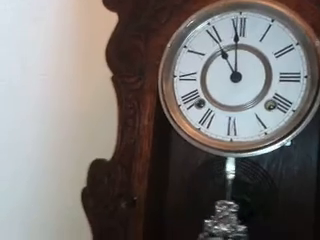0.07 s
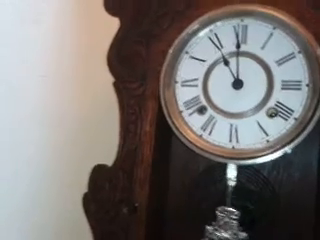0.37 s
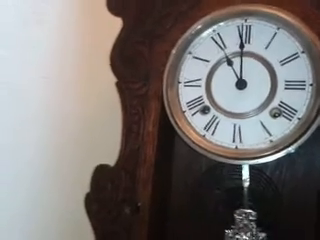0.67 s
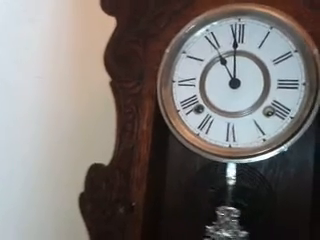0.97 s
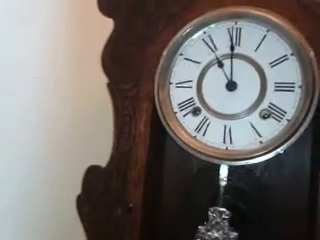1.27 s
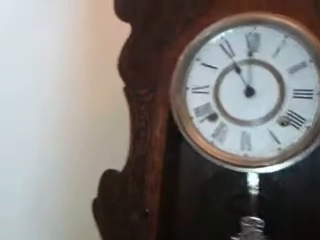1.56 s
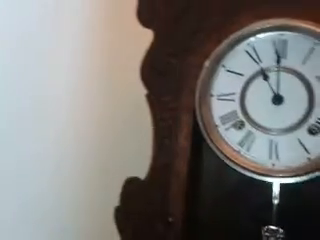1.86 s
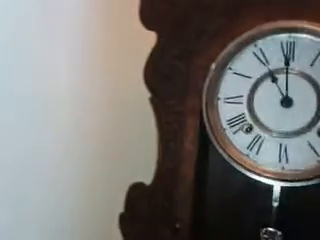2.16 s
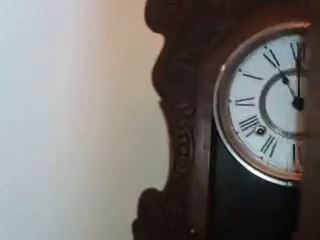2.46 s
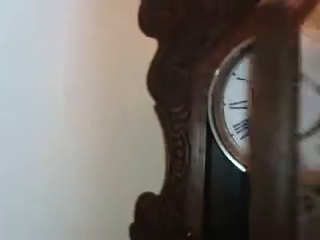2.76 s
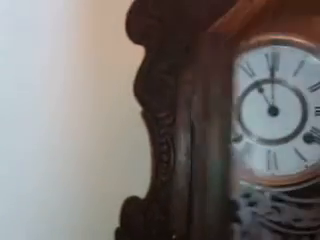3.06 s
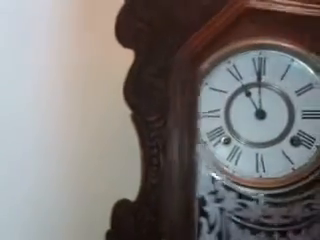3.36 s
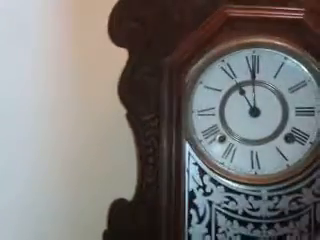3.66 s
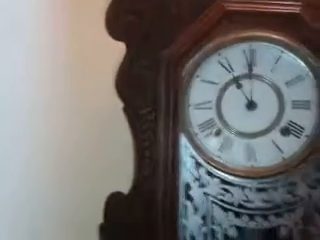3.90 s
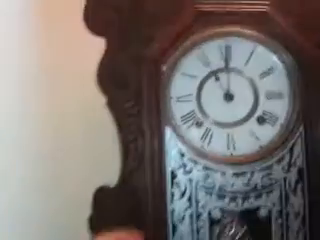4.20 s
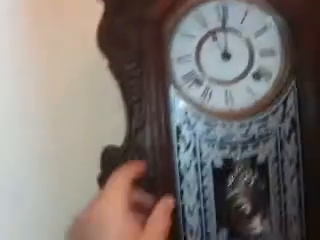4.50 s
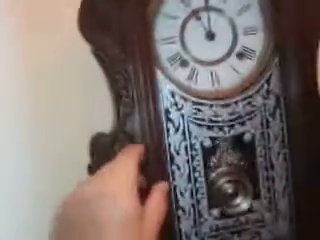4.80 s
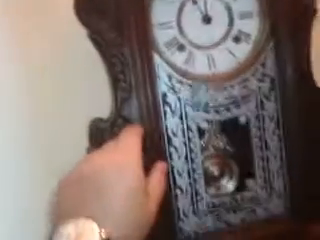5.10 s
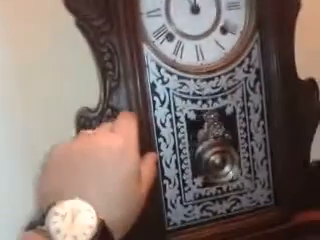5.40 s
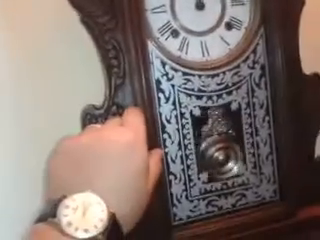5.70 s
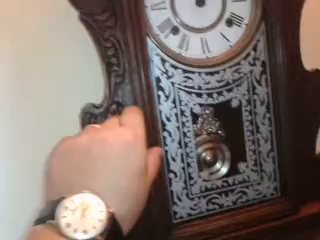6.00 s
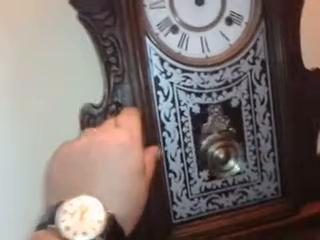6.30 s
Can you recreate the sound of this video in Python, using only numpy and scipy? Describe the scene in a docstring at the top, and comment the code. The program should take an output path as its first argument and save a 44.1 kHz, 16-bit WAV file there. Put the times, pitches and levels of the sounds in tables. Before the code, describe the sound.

An antique wooden clock is heard close up in a quiet room with faint hiss. Right at the start a padded hammer thuds on an already ringing wire gong, and it strikes again at about 1.2 seconds. Both strikes are loud, metallic and shimmering. Gears whir beneath them and stop with a click just after the second strike. The gong wavers and fades over the next several seconds, its brightest tones dying first. A steady tick-tock runs throughout, about two beats a second, becoming a little duller and woodier between 2 and 3 seconds. At about 4.1 seconds the glass door knocks softly on its wooden frame. Fingers rub faintly on the case around 4.6 seconds and again from 5.4. Just after 6 seconds come small taps and a faint creak, then the catch snaps shut, sharp and loud, at about 6.3 seconds.

```python
"""A small, quiet kitchen: an antique wooden clock strikes the last two blows of the hour.
A padded hammer thuds on a coiled wire gong, whose partials beat and shimmer as they ring out.
The strike train whirs until it locks; the escapement ticks on in steel, brass and wood.
A hand shuts the glass door, fumbles at the side of the case and snaps the creaky catch home."""
import sys
import numpy as np
from scipy import signal
from scipy.fft import rfft, irfft, next_fast_len
from scipy.io import wavfile
from scipy.ndimage import uniform_filter1d

SR = 44100
rng = np.random.default_rng(int(sys.argv[2]) if len(sys.argv) > 2 else 0)


def generate_wav(signal):
    """Clip the signal to [-1, 1] and save it as 16-bit WAV at the path in sys.argv[1]."""
    frames = np.transpose(np.atleast_2d(signal))
    scaled = np.clip(frames, -1, 1) * 32767
    pcm = np.round(scaled).astype(np.int16)
    wavfile.write(sys.argv[1], SR, pcm)


N = 280917
T = np.arange(N) / SR

# room tone spectrum: f/Hz, level/dB
ROOM_EQ = [(22, 5), (50, -6.5), (95, -37), (150, -19.5), (270, -5), (450, -1), (720, -5), (1300, -9.5),
           (2300, -11), (3200, -12), (5000, -13.5), (7000, -15), (7450, -41.5)]

# the gong's partials, spaced ever wider because the wire is stiff: f/Hz
GONG_HZ = [253.2, 301.6, 358, 415.2, 476.9, 543.4, 613, 687, 765.1, 846.9, 932.2, 1020.8, 1113, 1208.9,
           1307.6, 1410.9, 1517.1, 1626.9, 1740, 1856.6, 1975.2, 2098.8, 2223.8, 2352.8, 2485.6, 2622.3,
           2760.5, 2902.3, 3045.9, 3194.1]
# their voicing: first blow level/dB, last blow level/dB, t60/s, twin's offset down/Hz, twin's gain/dB
GONG_VOICING = [(-48, -49.5, 3.8, 2.2, -13), (-54, -54.5, 4, 3.2, -1), (-54, -50, 6.4, 3.9, -3),
                (-44, -48.5, 6.4, 9.8, -8.5), (-28.5, -28.5, 2.67, 4.53, -6), (-31, -26, 3.27, 4.5, -9.5),
                (-23.5, -26, 4.74, 5.3, -24.5), (-17, -17, 1.7, 4.1, -23.5), (-30, -26, 4.16, 4.6, -14.5),
                (-27, -27.5, 6.95, 11, -20.5), (-25.5, -20.5, 5.96, 11, -20), (-29, -31.5, 8.86, 13, -5),
                (-38, -27, 8.63, 10, -19), (-23, -23, 6.22, 13.8, -11), (-29.5, -27, 4.83, 14.1, -3.5),
                (-21, -24, 3.98, 20, -23.5), (-41, -34, 7.7, 16, -13), (-35, -37, 8.3, 11, -13.5),
                (-41, -34.5, 8.3, 17.3, -12.5), (-35.5, -36, 6.75, 18, -11.5),
                (-39.5, -42.5, 7.2, 37, -14.5), (-43, -43, 4.4, 66, -17), (-38, -40.5, 5.9, 40, -21.5),
                (-43.5, -39, 6.8, 24, -15), (-38, -45, 4.2, 28, -16.5), (-35.5, -32.5, 4, 22, -14),
                (-38, -34.5, 2.95, 30, -12.5), (-36, -39.5, 3.14, 21, -21.5), (-32, -31, 2.1, 28.1, -18),
                (-40.5, -40, 2.5, 18, -9)]
# the wire's short, bright shimmer: f/Hz
SHIMMER_HZ = [3342, 3649, 3803, 3920, 3960, 4121, 4242, 4283, 4408, 4934, 5305, 5530, 5692, 6090, 6295,
              6537, 6931, 7370]
# the same partials: level/dB
SHIMMER_DB = [-37.5, -46, -46.5, -49.5, -40, -44, -44, -40, -52.5, -43, -47.5, -49.5, -41.5, -44, -48,
              -46.5, -46, -70.5]
# partials that swell as the mic drifts through standing waves: f/Hz, period/s, dip t/s, echo share/0-1
SWELLS = [(1020.8, 1.73, 2.33, 0.3), (1113, 2.91, 1.61, 0.68), (1517.1, 3.38, 1.6, .62),
          (1626.9, 3.1, 2.42, .5)]
# spectrum of the coil's weak modes: f/Hz, level/dB
JANGLE_EQ = [(180, -37.5), (300, -21), (450, -7.5), (700, 0), (1400, -3), (1900, -6), (3200, -7),
             (4200, -4), (5500, -8.5), (7000, -11.5)]

# spectrum of the gears and fan: f/Hz, level/dB
WHIR_EQ = [(150, -50.5), (300, -29.5), (600, -3), (850, -8.5), (1400, 9.5), (1850, -3.5), (2300, -6.5),
           (2700, -14.5), (4200, -21), (5200, -21.5), (5700, -11.5), (6250, -26), (6900, -14),
           (7400, -39.5)]
# hammer blows: t/s, thud level/dB
BLOWS = [(0.0243, -2.5), (1.177, -2)]
# spectrum of the hammer's contact: f/Hz, level/dB
THUD_EQ = [(40, -52), (170, -53), (330, -22.5), (520, 16.5), (750, 1), (1400, 10.5), (1900, -13.5),
           (3200, -27), (7000, -26.5)]
# the backboard under the gong: f/Hz, width/Hz, level/dB
BOARD_MODES = [(556, 48, 0.5), (693, 32, 2.5), (902, 37, 1.5), (1283, 61, 0), (1417, 25, 0)]
# lever drops, the last of which locks the train: t/s, level/dB
LEVER_DROPS = [(.047, -36), (0.068, -20.5), (1.2245, -19)]
# spectrum of a lever's click: f/Hz, level/dB
LEVER_EQ = [(300, -37.5), (900, -7.5), (2000, 22), (3200, 2), (4200, 10), (5500, 15), (7000, -2.5)]

# a tick's steel pallet, brass plates and wooden case: f/Hz, width/Hz, level/dB
STEEL_MODES = [(3820, 180, 4.5), (4500, 750, -4), (5120, 200, -3), (6665, 100, -2.5)]
BRASS_MODES = [(1600, 94, -5), (2023, 110, 3), (2442, 75, 3.5), (3290, 440, -16)]
CASE_MODES = [(386, 20, -20.5), (696.4, 45.5, 4.5), (1120, 120, -17)]
# spectrum of the case under a tick: f/Hz, level/dB
WOOD_EQ = [(150, -35), (400, -23.5), (700, 0), (900, -5), (1150, 2.5), (1600, -7.5), (2700, -17),
           (6000, -26)]
# the ticks come up as the mic rounds the front of the case: t/s, gain/dB
NEARNESS = [(2.7, -3), (4.3, 0)]
# tick mix with the door open and shut: steel level/dB, brass level/dB, case level/dB
TICK_OPEN_DB, TICK_SHUT_DB = np.array([(-30, -28.5, -38), (-37.5, -29, -31.5)])
# trims for a tock and for a hand damping the case: steel gain/dB, brass gain/dB, case gain/dB
TOCK_DB, GRIP_DB = np.array([(-1, 3.5, -2.5), (-13.5, -7.5, -3.5)])

# the door meets its frame: t/s, level/dB
DOOR_KNOCKS = [(4.075, -38), (4.218, -46)]
# the wooden frame: f/Hz, width/Hz, level/dB
FRAME_MODES = [(371, 27, -11.5), (576, 42, 1)]
# fingers slide along the case: t/s, hold/s, level/dB
STROKES = [(4.55, 0.15, -65.5), (5.383, 0.53, -58.5), (6.147, .16, -56.5)]
# spectrum of fingers on wood: f/Hz, level/dB
FINGER_EQ = [(60, -49.5), (150, -38), (280, -3), (600, 4.5), (1300, -2), (2000, -3.5), (2750, -3.5),
             (3200, -18.5), (7000, -25)]
# the panel under the fingers: f/Hz, width/Hz, level/dB
PANEL_MODES = [(400, 32, -0.5), (746, 14, 2.5), (1873, 33, -0.5), (2324, 50, -2), (2790, 47, -20)]
# fingers bump the door and catch: t/s, relative level/dB, tilt/(dB per octave)
BUMPS = [(6.022, -49, 0), (6.118, -42, 1.5), (6.162, -41, -3), (6.179, -38, 4)]
# the creaking catch: f/Hz, width/Hz, level/dB
CREAK_MODES = [(1873, 70, -3), (2470, 90, -6), (2720, 60, 6)]
# the catch snaps and chatters: t/s, level/dB, tilt/(dB per octave)
CATCH_HITS = [(6.2881, -10, 0), (6.2903, -5.5, 3), (6.294, -17, -1.5), (6.2961, -11.5, -2.5),
              (6.306, -43, -13)]
# spectrum of the snap: f/Hz, level/dB
SNAP_EQ = [(30, -29), (150, -35), (350, -1), (700, -12), (1300, 2), (2100, 10.5), (3500, -2.5), (4300, 9),
           (5600, -10), (6300, 11), (7400, -6.5)]
# frame and glass ringing after the snap: f/Hz, width/Hz, level/dB
DOOR_MODES = [(690, 37, 2.5), (1110, 77, -1), (1780, 63, -1), (2020, 46, -15), (2380, 53, -20),
              (2870, 120, -4), (3300, 33, -1), (3800, 80, -8), (4020, 51, -0.5), (4980, 100, -17),
              (5100, 170, -3), (6200, 51, 1), (6740, 120, -10), (6980, 71, -18)]


def undb(db):
    """Decibels to gain."""
    return np.exp(np.asarray(db) * (np.log(10) / 20))


def unit(x):
    """Scale to rms 1."""
    return x / np.sqrt(np.mean(x ** 2))


def noise(size=SR // 2):
    """White noise."""
    return rng.standard_normal(size)


def wobble(rate_hz, size):
    """Random modulation that glides to a new value rate_hz times a second."""
    return np.interp(T[:size] * rate_hz, np.arange(400), noise(400))


def colour(x, eq, tilt_db=0):
    """Shape x with an EQ curve and a tilt per octave; rms 1."""
    hz, db = np.transpose(eq)
    size = next_fast_len(len(x))
    octave = np.log2(np.maximum(np.fft.rfftfreq(size, 1 / SR), 1))
    gain = undb(np.interp(octave, np.log2(hz), db) + tilt_db * octave)
    return unit(irfft(rfft(x, size) * gain, size)[:len(x)])


def resonate(x, modes):
    """Play x through a resonator bank of alternating polarity."""
    return sum((-1) ** k * undb(db) * signal.lfilter(*signal.iirpeak(hz, hz / width, SR), x)
               for k, (hz, width, db) in enumerate(modes))


def steady(x, size=400):
    """Level out a noise's chance swells, so the envelope alone sets its dynamics."""
    return x / np.sqrt(uniform_filter1d(x ** 2, size) + 1e-12)


def hit(rise_s, t60_s, tail_db, tail_t60_s=0.52):
    """Contact envelope: sharp attack, quick decay, then the room's tail."""
    t = T[:SR // 2]
    direct, tail = undb(-60 * t / t60_s), undb(tail_db - 60 * t / tail_t60_s)
    return (1 - np.exp(-t / rise_s)) * np.hypot(direct, tail)


def push(start_s, hold_s, db, attack_s, release_s):
    """Pressure envelope: swells up to start_s, holds and dies away."""
    early, late = np.maximum(start_s - T, 0), np.maximum(T - start_s - hold_s, 0)
    return undb(db) * np.exp(-early / attack_s - late / release_s)


def knock(modes, rise_s, detune=0):
    """A wooden body builds up from rest and rings out in its modes; peak 1."""
    t = T[:SR // 2]
    ring = sum((-1) ** k * undb(db) * np.exp(-np.pi * width * t)
               * np.sin(2 * np.pi * hz * (1 + detune) * t) for k, (hz, width, db) in enumerate(modes))
    ring *= (1 - np.exp(-t / rise_s)) ** 2
    return ring / np.abs(ring).max()


def radiate(x, hz):
    """Low cut: a small wooden case radiates almost nothing below hz."""
    return signal.sosfilt(signal.butter(4, hz, "high", fs=SR, output="sos"), x)


def add(out, s, x):
    """Mix x into out from time s."""
    i = int(s * SR)
    out[i:i + len(x)] += x[:max(N - i, 0)]


def room_tone(hiss_db=-56, hum_db=-66, hum_hz=303):
    """The bed: soft room hiss and a low, wavering hum."""
    hum = steady(resonate(noise(N), [(hum_hz, 0.66, 0)]), size=SR // 2)
    return undb(hum_db) * hum + undb(hiss_db) * colour(noise(N), ROOM_EQ)


def partial(hz, first_db, last_db, t60_s, rise_s=0.0025, flutter_db=0.29):
    """One fluttering mode of the wire, retriggered by each blow; an earlier blow still rings at first."""
    first, last = BLOWS[0][0], BLOWS[1][0]
    rings = (2 * first - last, first, first_db), (first, last, first_db), (last, N / SR, last_db)
    out = np.zeros(N)
    for start, stop, db in rings:
        end = min(stop, start + 2 * t60_s) + rise_s
        i, j = max(int(start * SR) + 1, 0), min(int(end * SR), N)
        age = T[i:j] - start
        gate = np.clip(np.minimum(age, stop - start + rise_s - age) / rise_s, 0, 1)
        level_db = db - 60 * age / t60_s + flutter_db * wobble(14, j - i)
        out[i:j] += undb(level_db) * gate * np.sin(2 * np.pi * hz * age + rng.uniform(0, 2 * np.pi))
    return out


def shut(t, closing_s=(2.1, 2.8)):
    """How far the door's glass screens the movement from the mic, 0-1."""
    return np.interp(t, closing_s, (0, 1))


def drift(hz, glass_db=-7.5, shade_db=-11, swing_s=3.1, pass_s=0.39):
    """A partial's gain at the moving mic: it phases against its echo, and the door gets in its way."""
    gain = undb(glass_db * shut(T)) if hz > 2550 else 1  # the glass muffles the highs
    for partial_hz, period_s, dip_s, echo in SWELLS:
        if abs(np.log(partial_hz / hz)) < .03:
            gain = gain * np.abs(1 - echo * np.exp(2j * np.pi * (T - dip_s) / period_s))
    if 1150 < hz < 1570:  # the door swings past and briefly shades the mids
        gain = gain * undb(shade_db * np.exp(-((T - swing_s) / pass_s) ** 2))
    return gain


def gong(twin_t60_ratio=0.97, shimmer_t60_s=1.42, shimmer_twin_db=-13):
    """The coil bends in two planes, so every partial beats against a slightly flat twin."""
    out = np.zeros(N)
    for hz, (first_db, last_db, t60_s, split_hz, twin_db) in zip(GONG_HZ, GONG_VOICING):
        out += drift(hz) * partial(hz, first_db, last_db, t60_s)
        out += partial(hz - split_hz, first_db + twin_db, last_db + twin_db, t60_s * twin_t60_ratio)
    for hz, db in zip(SHIMMER_HZ, SHIMMER_DB):
        for ratio, level_db in ((1, db), (.99, db + shimmer_twin_db)):
            out += partial(hz * ratio, level_db, level_db, shimmer_t60_s, rise_s=0.014)
    return radiate(out, hz=199)


def jangle(level_db=-35, dark_t60_s=5.2, bright_t60_s=0.72):
    """Countless weak coil modes make a wash between the partials; the bright ones die first."""
    first, last = BLOWS[0][0], BLOWS[1][0]
    age = T - np.select([T >= last, T >= first], [last, first], 2 * first - last)
    wash = undb(level_db) * colour(noise(N), JANGLE_EQ)
    dark = signal.sosfilt(signal.butter(2, 2400, fs=SR, output="sos"), wash)
    return dark * undb(-60 * age / dark_t60_s) + (wash - dark) * undb(-60 * age / bright_t60_s)


def strike_train(level_db=-36, throb_hz=10.5, throb_db=2, tooth_db=3, stop_s=0.032):
    """Gears and fan whir with a toothy grain and a throb until the locking lever drops."""
    teeth = np.repeat(undb(tooth_db * noise(N // 200 + 1)), 200)[:N]
    running = np.exp(-np.maximum(T - LEVER_DROPS[-1][0], 0) / stop_s)
    throb = throb_db * np.sin(2 * np.pi * throb_hz * T)
    return running * undb(level_db + throb) * colour(noise(N) * teeth, WHIR_EQ)


def hammer(contact_db=-7):
    """The padded hammer lands on the wire and thuds through the backboard."""
    out = np.zeros(N)
    for s, db in BLOWS:
        contact = undb(contact_db) * steady(colour(noise(), THUD_EQ), size=150)
        contact *= hit(rise_s=0.0006, t60_s=0.05, tail_db=-15, tail_t60_s=0.74)
        add(out, s, undb(db) * radiate(knock(BOARD_MODES, rise_s=0.00027) + contact, hz=415))
    return out


def levers():
    """The strike train's levers drop with bright clicks."""
    out = np.zeros(N)
    for s, db in LEVER_DROPS:
        click = colour(noise(), LEVER_EQ) * hit(rise_s=0.00039, t60_s=0.067, tail_db=-19.5)
        add(out, s, undb(db) * click)
    return out


def beats(first_s=.3055, pendulum_s=.9552, tock_after_s=.4542, grip_s=5.8, scatter_db=.5):
    """Cue and mix of each tick and tock; the shut door dulls the steel and lets the case speak."""
    for tick_s in np.arange(first_s, N / SR, pendulum_s):
        for s, trim_db in ((tick_s, 0), (tick_s + tock_after_s, TOCK_DB)):
            db = (1 - shut(s)) * TICK_OPEN_DB + shut(s) * TICK_SHUT_DB
            db += trim_db + np.interp(s, *np.transpose(NEARNESS)) + (s > grip_s) * GRIP_DB
            if s < N / SR:
                yield s, db + scatter_db * noise(3)


def escapement(wood_db=-4):
    """A tooth drops on the pallet: the steel speaks first, then the brass plates, then the case."""
    out = np.zeros(N)
    for s, (steel_db, brass_db, case_db) in beats():
        steel = steady(resonate(noise(), STEEL_MODES)) * hit(rise_s=0.0019, t60_s=0.088, tail_db=-20)
        brass = steady(resonate(noise(), BRASS_MODES)) * hit(rise_s=0.0052, t60_s=0.073, tail_db=-21.5)
        body = knock(CASE_MODES, rise_s=0.0066, detune=0.018 * rng.standard_normal())
        body += undb(wood_db) * colour(noise(), WOOD_EQ) * hit(rise_s=0.0029, t60_s=0.12, tail_db=-12)
        add(out, s, undb(steel_db) * steel + undb(brass_db) * brass + undb(case_db) * body)
    return out


def door():
    """The door knocks softly on its wooden frame."""
    out = np.zeros(N)
    for s, db in DOOR_KNOCKS:
        add(out, s, undb(db) * knock(FRAME_MODES, rise_s=0.0043))
    return out


def finger_rub(panel_db=1, waver_db=0.83):
    """Fingers slide with uneven pressure, and their friction sounds the panel."""
    friction = colour(noise(N), FINGER_EQ)
    panel = undb(panel_db) * unit(resonate(noise(N), PANEL_MODES))
    pressure = sum(push(*stroke, attack_s=0.076, release_s=0.069) for stroke in STROKES)
    return pressure * undb(waver_db * wobble(12, N)) * (friction + panel)


def finger_bumps():
    """Fumbling fingertips tap the door and the catch."""
    out = np.zeros(N)
    for s, db, tilt_db in BUMPS:
        tap = 2 * colour(noise(), FINGER_EQ, tilt_db) * hit(rise_s=0.0063, t60_s=0.075, tail_db=-24)
        add(out, s, undb(db) * tap)
    return out


def catch_creak(slips_per_s=260):
    """The stiff catch sticks and slips as it is pushed, and each slip rings it."""
    slips = (rng.random(N) < slips_per_s / SR).astype(float)
    pressure = push(start_s=6.115, hold_s=0.2, db=-55, attack_s=.008, release_s=.015)
    return pressure * unit(resonate(slips, CREAK_MODES))


def catch_snap(ring_db=-13):
    """The catch snaps home and chatters; its hardest hit sets frame and glass ringing."""
    out = np.zeros(N)
    for s, db, tilt_db in CATCH_HITS:
        snap = undb(db) * steady(colour(noise(), SNAP_EQ, tilt_db), size=90)
        add(out, s, snap * hit(rise_s=0.000067, t60_s=0.057, tail_db=-24, tail_t60_s=0.38))
    ring = undb(ring_db) * steady(resonate(noise(), DOOR_MODES))
    add(out, CATCH_HITS[1][0], ring * hit(rise_s=0.00035, t60_s=0.12, tail_db=-12, tail_t60_s=0.44))
    return out


def scene(hand_ring_db=6, tick_ring_db=1):
    """The mix: clock and hand over the room tone."""
    ticks = escapement()
    hand = door() + finger_rub() + catch_creak() + finger_bumps() + catch_snap()
    # the gong rings in sympathy: the hand stirs its low partials, the ticks its shimmer
    hand_ring = undb(hand_ring_db) * resonate(hand, [(hz, 3, 0) for hz in GONG_HZ[:24]])
    tick_ring = undb(tick_ring_db) * resonate(ticks, [(hz, 3, 0) for hz in SHIMMER_HZ[:10]])
    bed = room_tone()
    strike = gong() + jangle() + hammer() + levers() + strike_train()
    return (bed + strike + ticks + tick_ring + hand + hand_ring)[None]


def record(dry, mic_hz=7375, ceiling=0.81, top_hz=16000):
    """A narrow-band mic that soft-clips the loudest peaks."""
    heard = signal.sosfilt(signal.ellip(7, .3, 45, mic_hz, fs=SR, output="sos"), dry)
    heard = signal.sosfilt(signal.ellip(8, .2, 70, 9000, fs=SR, output="sos"), heard)
    clipped = heard / (1 + (heard / ceiling) ** 8) ** (1 / 8)
    return signal.sosfilt(signal.ellip(8, .2, 70, top_hz, fs=SR, output="sos"), clipped)


dry = scene()
out = record(dry)
generate_wav(out)
```